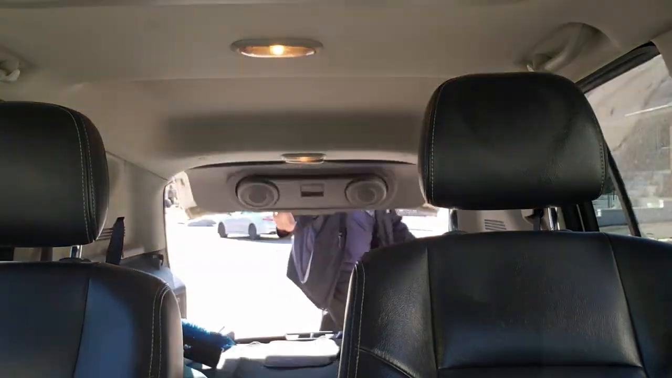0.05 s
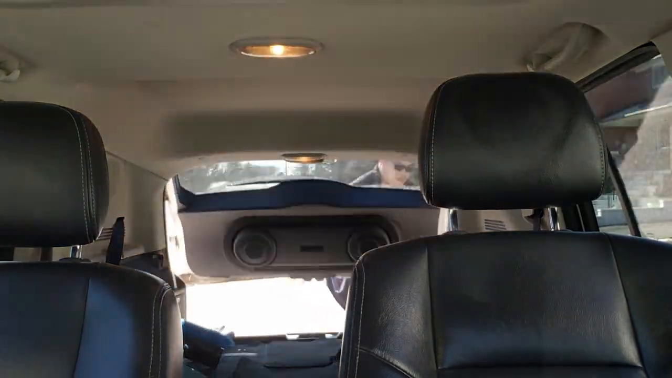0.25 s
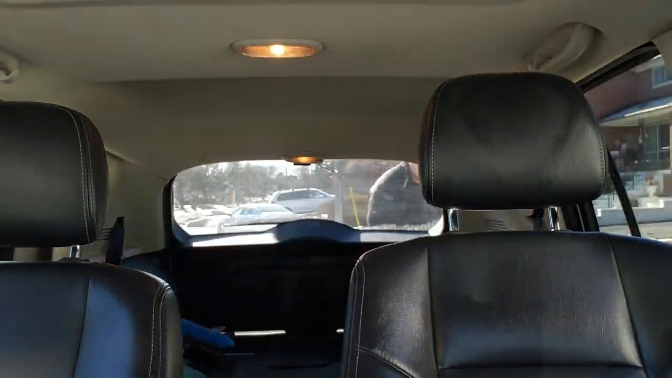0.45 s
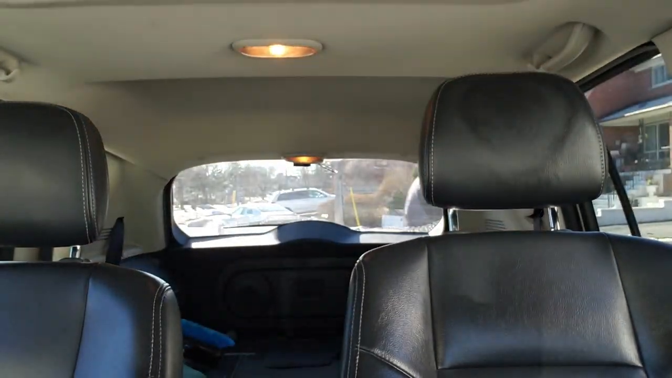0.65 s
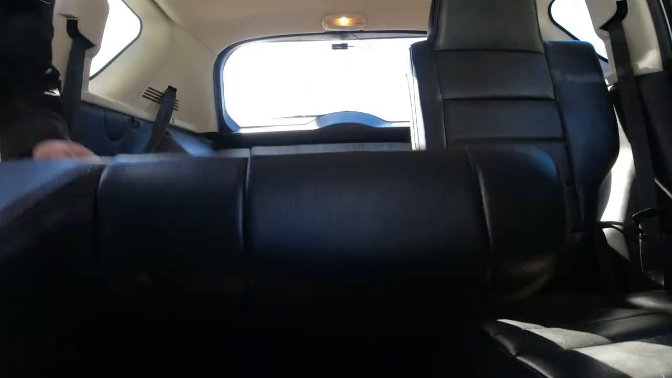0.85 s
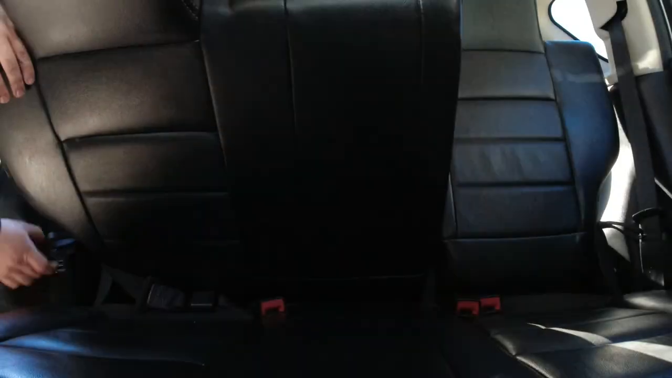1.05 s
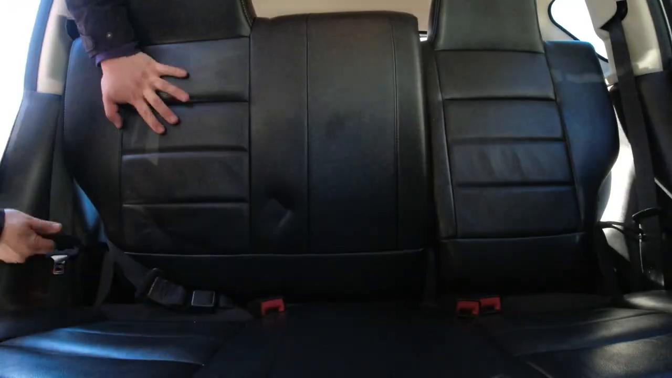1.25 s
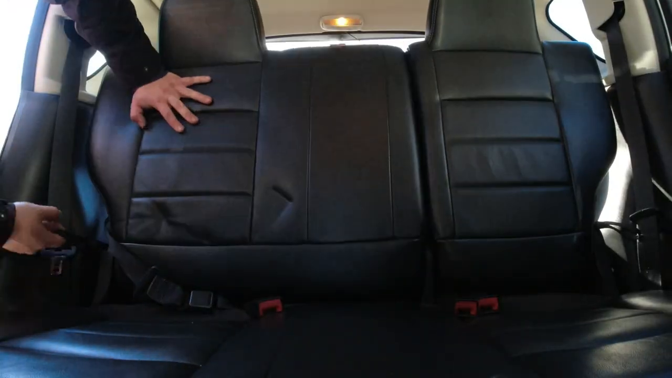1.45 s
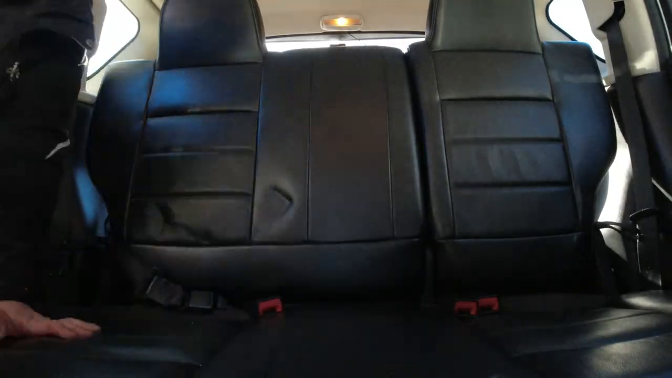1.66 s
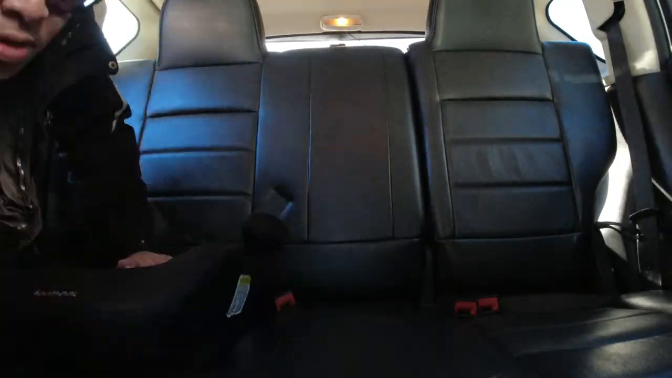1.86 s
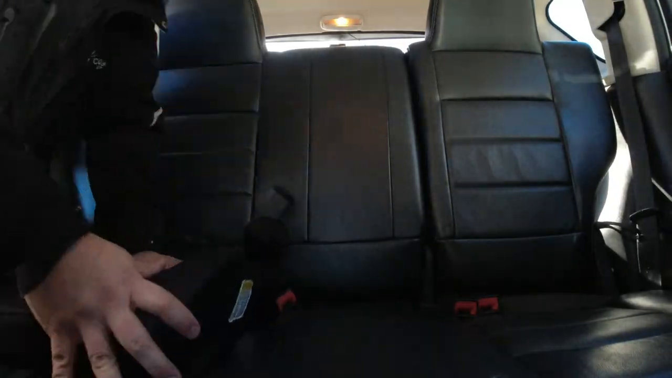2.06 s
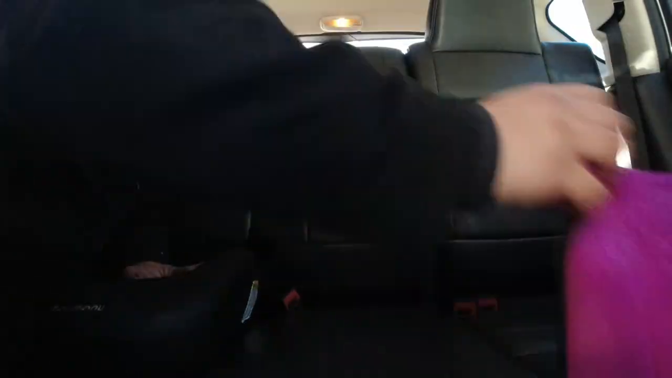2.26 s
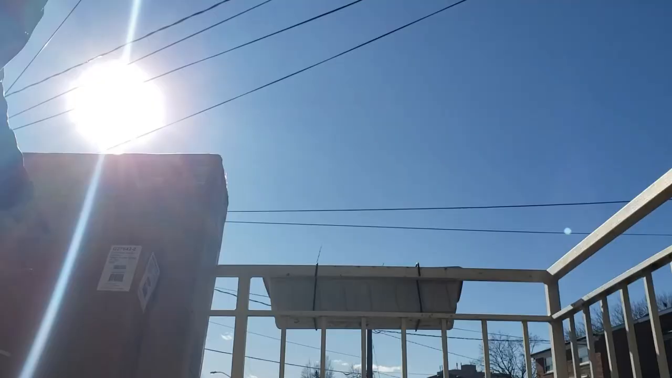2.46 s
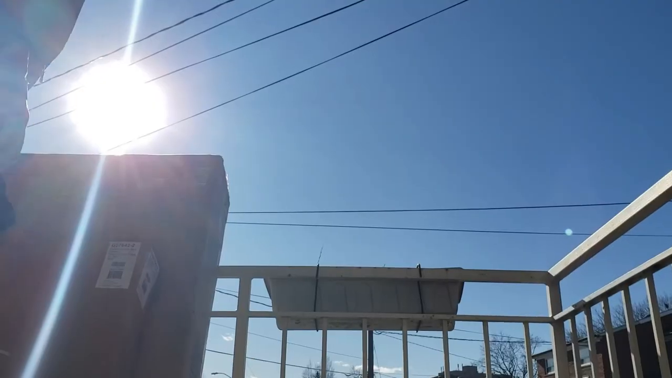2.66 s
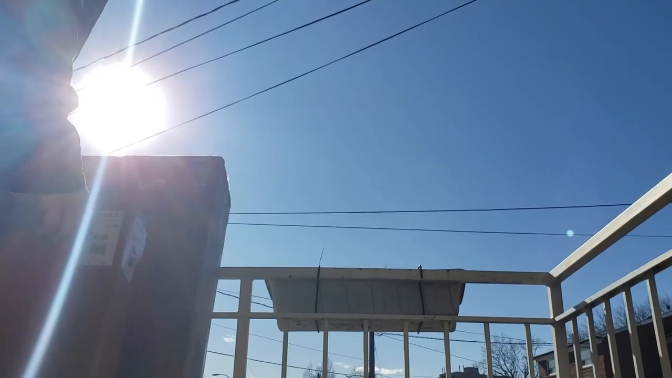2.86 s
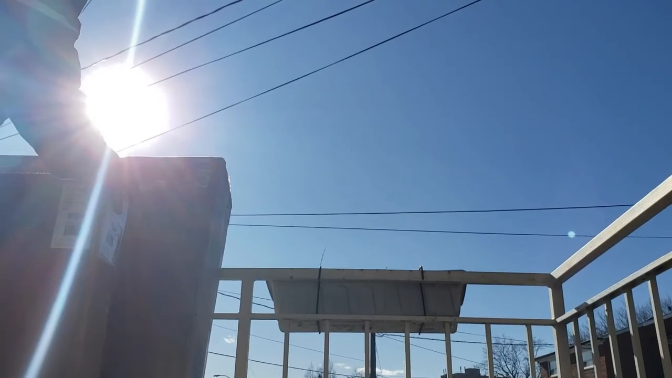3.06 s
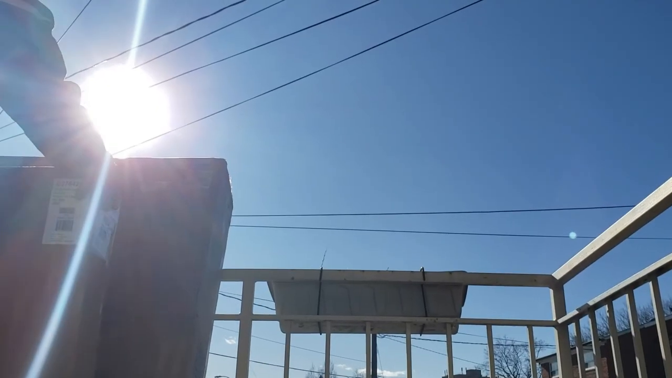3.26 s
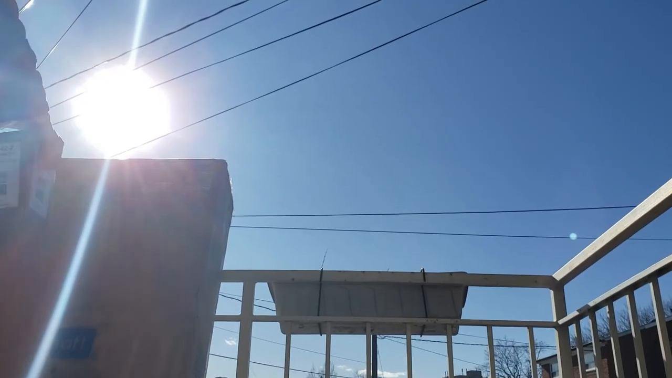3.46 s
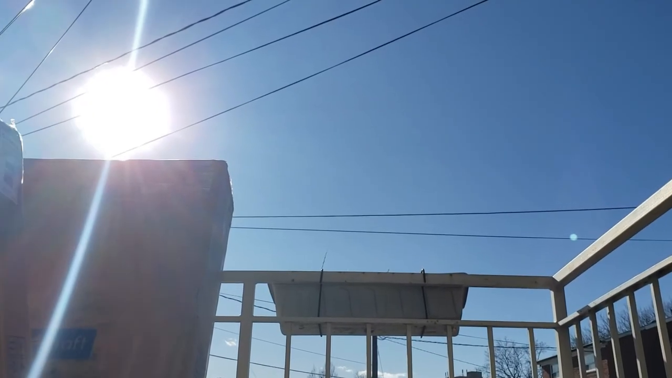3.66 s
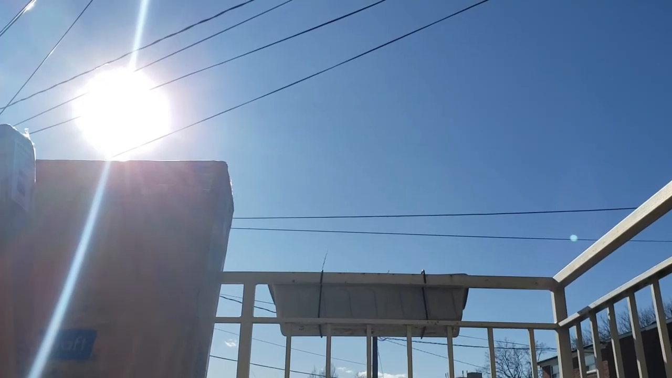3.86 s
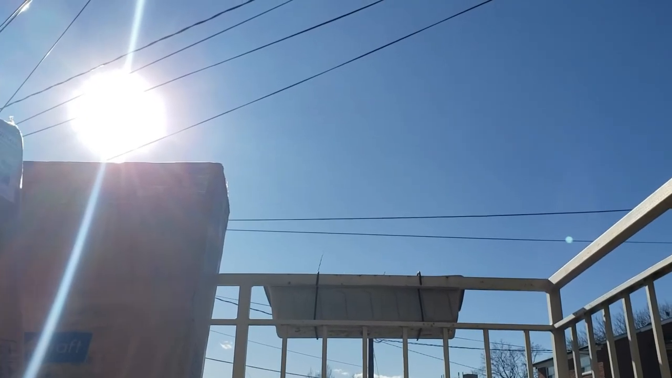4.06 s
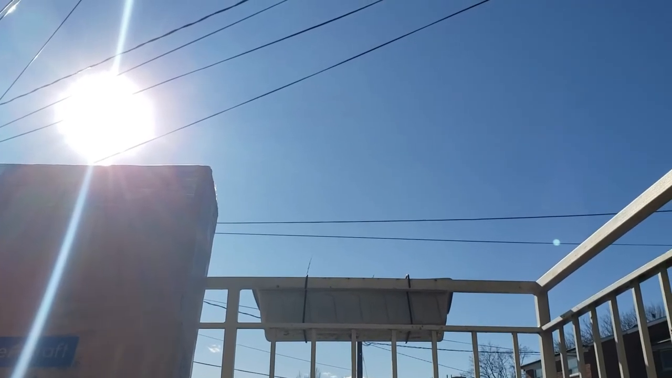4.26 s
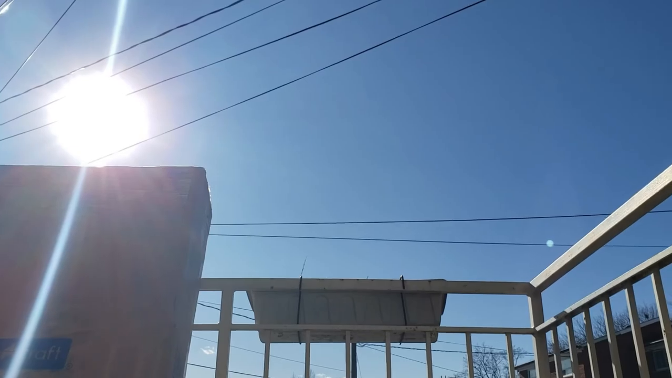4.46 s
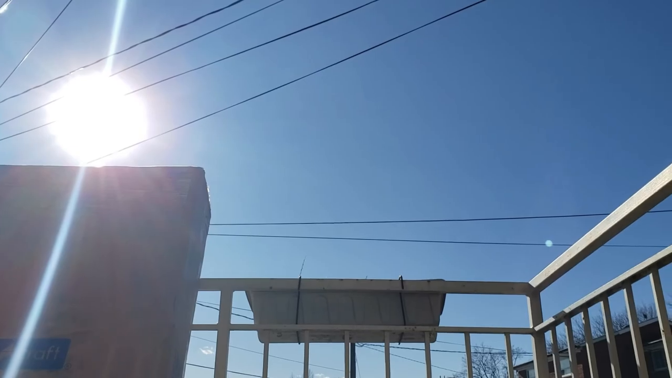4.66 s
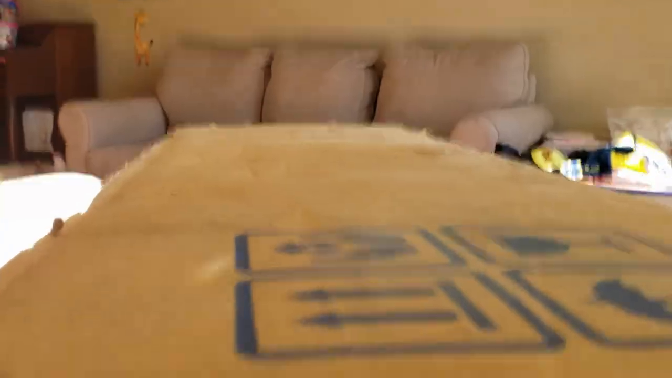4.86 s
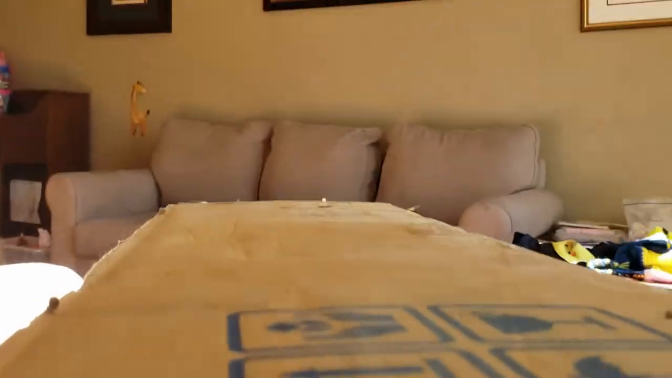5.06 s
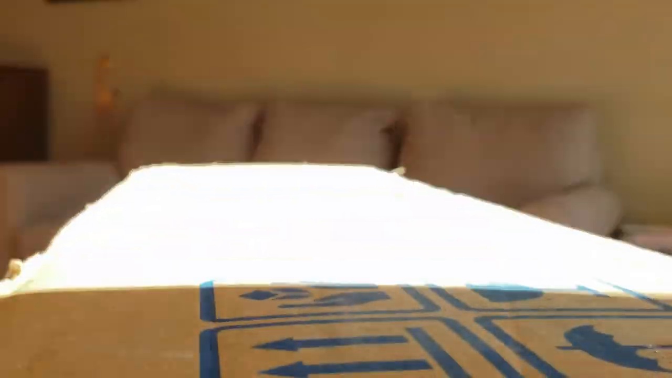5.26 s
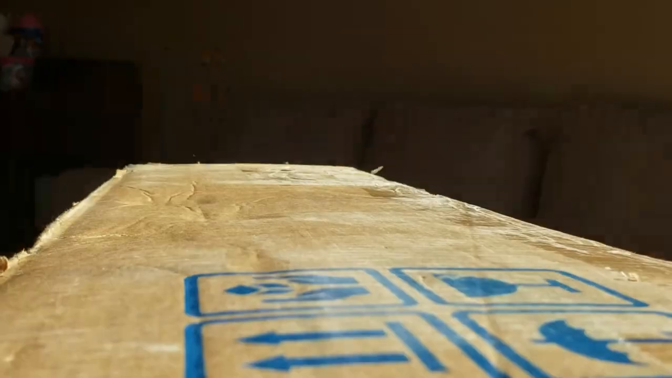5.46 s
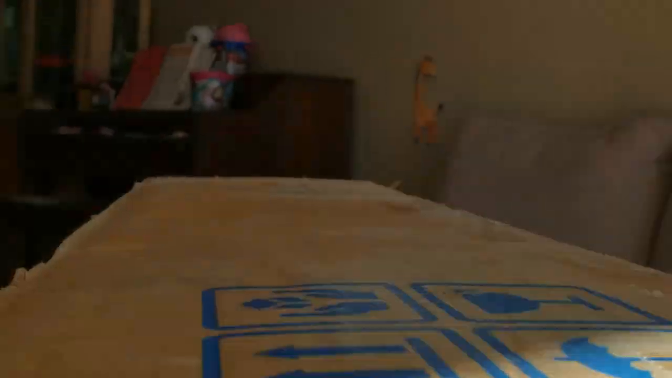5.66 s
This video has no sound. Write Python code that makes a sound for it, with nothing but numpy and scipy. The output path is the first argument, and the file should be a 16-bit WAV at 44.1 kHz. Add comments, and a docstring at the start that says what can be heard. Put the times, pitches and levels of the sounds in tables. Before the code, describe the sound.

Inside a car, a rear liftgate rattles briefly and slams very loudly, with a sharp latch crack and booming cabin. A hard cut brings close, dense knocks, clicks and leather rubbing as bags land on the back seat. Another cut drops to very quiet outdoor traffic rumble and faint hands on cardboard. Finally, in a room, a box scrapes close to the microphone with low bumps and short squeaks.

```python
"""Van liftgate, leather bench, cardboard box

Four scenes joined by hard cuts. Van: the gate rattles down and slams; noise bursts, modal boom, cabin air.
Bench: knocks of noise and short rings, a seat-latch spring buzz and rubbed leather as bags are dropped.
Outdoors: gritty noise for hands on a cardboard box, over a far traffic roar.
Room: the box is dragged; noise scrapes, ringing jolts, stick-slip squeaks. The left microphone port is more open."""
import sys
import numpy as np
from scipy import signal
from scipy.fft import rfft, irfft, next_fast_len
from scipy.io import wavfile
from scipy.ndimage import uniform_filter1d, map_coordinates

SR = 44100
rng = np.random.default_rng(int(sys.argv[2]) if len(sys.argv) > 2 else 0)


def to_wav(s):
    """Save 16-bit WAV."""
    ch = np.atleast_2d(s).T  # columns
    pcm = np.round(np.clip(ch, -1, 1) * 32767)  # PCM
    wavfile.write(sys.argv[1], SR, pcm.astype(np.int16))


N = 252312
T_S = np.arange(N) / SR
SLAM_S = 0.5402

# noise spectrum of the van trim: freq_hz, density_db
TRIM = [(150, -31), (250, 0), (407, 1.5), (484, -7.5), (673, -0.5), (760, -5.5), (4400, -14.5), (5600, -9),
        (7000, -19), (8000, -28.5), (15900, -20)]
# port likeness in the van: freq_hz, likeness_0_to_1
VAN_ALIKE = [(200, 0.83), (4000, .05)]
# left-over-right level in the van: freq_hz, left_minus_right_db
VAN_LEAN = [(60, 8.9), (380, 12.8), (2380, 17.2), (15000, 6.3)]
# port likeness at the bench: freq_hz, likeness_0_to_1
BENCH_ALIKE = [(950, 0.98), (4000, 0.92), (15000, 0.18)]
# port likeness outdoors: freq_hz, likeness_0_to_1
PORCH_ALIKE = [(100, 1), (1200, 0.044)]
# port likeness in the room: freq_hz, likeness_0_to_1
ROOM_ALIKE = [(60, 0.21), (900, 0.016)]
# left-over-right level outdoors and in the room: freq_hz, left_minus_right_db
BOX_LEAN = [(60, -12), (550, 11), (1650, 13.5), (4970, 19.5), (15000, 1)]
# noise spectrum of rubbed cardboard: freq_hz, density_db
CARD = [(710, -33), (1200, -4.5), (2060, -4), (4210, -4.5), (5880, -1), (7870, -15.5), (12100, -10.5),
        (15900, -16.5)]


def amp(db):
    """Amplitude factor of a level in dB."""
    return 10 ** (np.asarray(db) / 20)


def unit(x):
    """x scaled to rms 1."""
    return x / np.sqrt(np.mean(x ** 2) + 1e-20)


def along(points, hz):
    """Values of (freq_hz, value) points, interpolated on a log axis."""
    point_hz, values = np.transpose(points)
    return np.interp(np.log(hz + 1), np.log(point_hz + 1), values)


def gain_curve(rows):
    """Gain per sample from (time_s, level_db) rows."""
    time_s, level_db = np.transpose(rows)
    return amp(np.interp(T_S, time_s, level_db))


def wobble(rate_hz):
    """Smooth random curve, rate_hz knots a second."""
    knots = rng.standard_normal(int(N * rate_hz / SR) + 4)
    return map_coordinates(knots, [np.arange(N) * rate_hz / SR])


def filtered(x, response):
    """x times a response of frequency."""
    size = next_fast_len(N + 8192)
    return irfft(rfft(x, size) * response(np.fft.rfftfreq(size, 1 / SR)), size)[..., :N]


def rush(spectrum, alike, lean=((1, 0),), grain_db=0, rate_hz=300, patchy_db=0):
    """Stereo noise, mid rms 1; grain_db flutters its level, patchy_db breaks it into time-frequency blobs."""
    z = signal.stft(rng.standard_normal((2, N)), nperseg=256)[2]
    blobs = uniform_filter1d(rng.standard_normal(z.shape[1:]), 7, 0)
    blobs = unit(uniform_filter1d(blobs, 4, 1))
    noise = signal.istft(z * amp(patchy_db * blobs), nperseg=256)[1][:, :N]
    common, apart = noise * amp(grain_db * wobble(rate_hz))

    def likeness(hz):
        return np.clip(along(alike, hz), -1, 1)

    def side(hz):
        return amp(along(lean, hz) / 2)

    def gain(hz):
        mid_power = side(hz) ** 2 + side(hz) ** -2 + 2 * likeness(hz)
        return amp(along(spectrum, hz)) / np.sqrt(mid_power)

    left = filtered(common, lambda hz: gain(hz) * side(hz))
    right = filtered(common, lambda hz: gain(hz) / side(hz) * likeness(hz))
    right = right + filtered(apart, lambda hz: gain(hz) / side(hz) * np.sqrt(1 - likeness(hz) ** 2))
    return np.array([left, right]) / np.std(left + right) * 2


def add(track, start_s, piece):
    """Mixes a piece into the track at start_s."""
    i = round(start_s * SR)
    track[i:i + len(piece)] += piece[:N - i]


def held(hold_s, t60_s, attack_s=0.0005):
    """Envelope: exponential rise, hold, exponential decay."""
    t = np.arange(SR // 2) / SR
    return (1 - np.exp(-t / attack_s)) * amp(-60 * np.maximum(t - hold_s, 0) / t60_s)


def ring(modes, spread_db, attack_s):
    """One blow on decaying modes (freq_hz, level_db, t60_s), their levels varied at random."""
    t = np.arange(SR // 2) / SR
    tone = 0
    for hz, db, t60_s in modes:
        level_db = db + spread_db * rng.standard_normal() - 60 * t / t60_s
        tone = tone + amp(level_db) * np.sin(2 * np.pi * hz * t)
    return (1 - np.exp(-t / attack_s)) * tone


def stroke(length_s, edge_s=0.0077):
    """Envelope of a rubbing stroke: flat with ramped ends."""
    t = np.arange(round((length_s + edge_s) * SR)) / SR
    return np.clip(np.minimum(t, length_s + edge_s - t) / edge_s, 0, 1)


def ticks(per_s, spread_db, t60_s):
    """Envelope of rms 1 made of scattered short ticks of uneven size."""
    hits = (rng.random(N) < per_s / SR) * amp(spread_db * rng.standard_normal(N))
    return unit(np.convolve(hits, held(0, t60_s, attack_s=0.00017)[:600])[:N])


def slam_boom():
    """Strut and hinge jolts thud, then the slam's air pulse rings cabin and panel modes."""
    # strut and hinge jolts: start_s, pitch_hz, level_db
    thuds = [(0.053, 179.3, -32), (0.285, 180.8, -21), (.387, 107.8, -24), (0.517, 129.5, -12)]
    # cabin and panel modes: freq_hz, level_db, t60_s
    cabin_modes = [(53.53, 4, 0.58), (57, -10, 0.69), (43.5, -4, 0.78), (75, 6.5, 0.18), (133.4, -6, 0.66),
                   (152, -13.5, 0.98), (183, -8.5, 0.33), (408, -31, 1)]
    slam_db, thud_t60_s = -8, 0.25
    boom = np.zeros(N)
    for start_s, hz, db in thuds:
        add(boom, start_s, ring([(hz, db, thud_t60_s)], spread_db=0.5, attack_s=0.0049))
    add(boom, SLAM_S, -amp(slam_db) * ring(cabin_modes, spread_db=0.5, attack_s=0.005))
    # each port meets the modes in its own phase
    right = filtered(boom, lambda hz: np.exp(0.7j * np.sin(hz / 9)))
    return np.array([boom, right]) * amp([[3], [-4.5]])


def gate_rattle():
    """Trim rattles and gate contacts: decaying noise, treble dying first, over ringing trim panels."""
    # trim rattling as the gate swings down: start_s, level_db, t60_s
    rattles = [(0.113, -31, 0.11), (.277, -37, 0.23), (0.424, -51.5, 0.9)]
    # gate meets seal, latch and stop, then rebounds twice: start_s, level_db, hold_s, t60_s
    contacts = [(.516, -18, 0.016, 0.018), (0.531, -11.5, 0.0072, 0.061), (.544, -29, .01, 0.012),
                (.558, -23, 0.032, 0.17), (0.61, -27, 0.0052, 0.5)]
    # trim panel modes: freq_hz, level_db
    panel_modes = [(640, 2), (930, -5.5), (1560, -13), (2300, -5.5), (2920, -15)]
    rattle_hold_s, panel_t60_s, panel_db = 0.013, 0.087, -6.5
    rattle_dull, contact_dull = 0.63, 0.43  # amplitude share without treble
    bright, dull, panel = np.zeros((3, N))
    events = [(start_s, db, rattle_hold_s, t60_s, rattle_dull) for start_s, db, t60_s in rattles]
    events += [(*row, contact_dull) for row in contacts]
    modes = [(*mode, panel_t60_s) for mode in panel_modes]
    for start_s, db, hold_s, t60_s, share in events:
        add(bright, start_s, amp(db) * (1 - share) * held(hold_s, 0.52 * t60_s))
        add(dull, start_s, amp(db) * share * held(hold_s, t60_s))
        add(panel, start_s, amp(db + panel_db) * ring(modes, spread_db=0.5, attack_s=0.004))
    full_trim = rush(TRIM, VAN_ALIKE, VAN_LEAN, grain_db=2, patchy_db=2)
    low_trim = rush(TRIM, VAN_ALIKE, VAN_LEAN, grain_db=1)
    low_trim = filtered(low_trim, lambda hz: 1.22 / np.hypot(1, (hz / 2500) ** 2))
    return bright * full_trim + dull * low_trim + panel * amp([[3], [-4.5]])


def latch_bite():
    """The latch bites: a very high, brief noise burst."""
    burst = np.zeros(N)
    add(burst, 0.531, amp(-18.5) * held(0.0029, 0.029))
    return burst * rush([(13500, -22), (15100, -2.5), (16000, -26)], VAN_ALIKE, [(1, 13)])


def gas_strut():
    """The gas strut hisses: one stroke of high band noise."""
    start_s, length_s, level_db = 0.22, 0.045, -57
    hiss = np.zeros(N)
    add(hiss, start_s, amp(level_db) * stroke(length_s))
    return hiss * rush([(5000, -25), (6500, 5.5), (7400, -21.5)], VAN_ALIKE, VAN_LEAN, patchy_db=0.5)


def van_background():
    """Low cabin rumble, and street noise shut out as the gate closes."""
    # cabin rumble: time_s, level_db
    cabin_level = [(0.0, -41), (0.662, -27.5), (0.866, -40.5)]
    # cabin rumble spectrum: freq_hz, density_db
    rumble = [(25, -12), (54, 3.5), (139, -8), (172, 4), (253, -17.5), (403, -15.5), (600, -32), (780, -48),
              (1320, -120)]
    air = gain_curve(cabin_level) * rush(rumble, VAN_ALIKE, VAN_LEAN, grain_db=2, rate_hz=8.8)
    opening = np.clip((SLAM_S - T_S) / 0.34, 0, 1)
    far = filtered(rush(TRIM, VAN_ALIKE, VAN_LEAN), lambda hz: 1 / np.hypot(1, (hz / 7500) ** 0.31))
    return air + amp(-53.5) * opening * far


def liftgate():
    """The gate rattles down and slams: boom, trim, latch and strut over the van background."""
    return slam_boom() + gate_rattle() + latch_bite() + gas_strut() + van_background()


def latch_spring():
    """Latch spring buzz: high tones with random level and phase flutter."""
    # spring buzz: start_s, hold_s, then a list of tones: freq_hz, level_db
    spring_buzz = (1.146, .045, [(7000, -54), (10500, -55)])
    start_s, hold_s, tones = spring_buzz
    envelope = np.zeros(N)
    add(envelope, start_s, held(hold_s, 0.038))
    buzz = 0
    for hz, db in tones:
        phase = 2 * np.pi * hz * T_S + 2.8 * wobble(350)
        buzz = buzz + amp(db + 2.29 * wobble(430)) * np.sin(phase)
    return envelope * buzz


def rub_envelopes():
    """Cloth and leather envelopes: each stroke mixes both; louder strokes hold more leather."""
    # leather and cloth strokes: start_s, hold_s, level_db
    rubs = [(1.15, 0.087, -60.5), (1.438, 0.1, -64.5), (1.505, 0.042, -37), (1.631, 0.038, -50),
            (1.711, 0.027, -35), (1.763, 0.1, -47), (1.897, 0.11, -55), (2.068, 0.015, -38),
            (2.141, 0.047, -42.5), (2.197, 0.072, -51.5), (2.28, 0.022, -34), (2.349, 0.037, -40.5),
            (2.397, 0.099, -47)]
    no_leather_db, no_cloth_db = -68, -13.5  # ends of the mixing scale
    cloth, leather = np.zeros((2, N))
    for start_s, hold_s, db in rubs:
        share = np.clip((db - no_leather_db) / (no_cloth_db - no_leather_db), 0, 1)
        add(cloth, start_s, amp(db) * (1 - share) * held(hold_s, 0.089, attack_s=0.0075))
        add(leather, start_s, amp(db) * share * held(hold_s, 0.085, attack_s=0.01))
    return cloth, leather


def knocks():
    """Envelopes of noise puff and bright crack per knock, and its two-mode ring with a cushion thump."""
    # knocks: start_s, level_db, ring_hz, second_ring_hz, thump_db, crack_db
    knock_rows = [(0.97, -42, 530, 1400, -53, -75), (1.067, -32.5, 3560, 4530, -60, -66),
                  (1.14, -26, 1850, 4600, -54, -26.5), (1.256, -24, 614, 2020, -24.5, -61),
                  (1.346, -28.5, 2760, 7440, -37.5, -28), (1.518, -38.5, 830, 4300, -22, -35),
                  (1.529, -24.5, 2030, 750, -26.5, -24), (1.548, -36, 706, 2010, -39, -29),
                  (1.604, -25, 854, 1420, -29.5, -53), (1.618, -21.5, 647, 1250, -32.5, -30.5),
                  (1.675, -34, 1150, 670, -35, -58), (1.7, -24.5, 423, 950, -33, -45),
                  (1.719, -20.5, 710, 1350, -44, -32.5), (1.737, -21, 734, 1160, -19, -43),
                  (1.771, -28, 1300, 1810, -24.5, -54), (1.792, -35, 2230, 2960, -51, -42.5),
                  (1.816, -19.5, 1910, 800, -20, -32), (1.829, -25, 756, 1100, -21.5, -29),
                  (1.935, -29, 790, 2070, -38, -39), (2.03, -32, 2470, 2060, -28, -39),
                  (2.073, -34, 845, 2490, -35, -37), (2.086, -26, 520, 980, -29, -56),
                  (2.15, -45.5, 1900, 1170, -30, -49), (2.226, -38.5, 1740, 730, -45, -55),
                  (2.248, -34.5, 800, 1370, -37, -62), (2.279, -31, 1030, 1680, -52, -55),
                  (2.299, -18, 650, 845, -27, -35), (2.372, -23.5, 2490, 1120, -35, -30.5),
                  (2.457, -28, 645, 905, -41.5, -48), (2.47, -39, 1900, 1430, -41, -40)]
    # seat cushion modes: freq_hz, level_db, t60_s
    cushion_modes = [(143, -11, 0.17), (169, -1, 0.09), (245.7, -2.5, 0.075), (348, -1, 0.065)]
    puff_db, second_db = -9, -1.5  # relative to the ring; to the first ring
    puff, crack, tones = np.zeros((3, N))
    for start_s, db, hz, second_hz, thump_db, crack_db in knock_rows:
        add(puff, start_s, amp(db + puff_db) * held(0.0015, 0.022, attack_s=0.0003))
        add(crack, start_s, amp(crack_db) * held(0.00067, 0.015, attack_s=0.00067))
        # low rings last longer
        modes = [(hz, 0, 0.007 + 7 / hz), (second_hz, second_db, 0.007 + 7 / second_hz)]
        add(tones, start_s, amp(db) * ring(modes, spread_db=1.9, attack_s=0.00012))
        add(tones, start_s, amp(thump_db) * ring(cushion_modes, spread_db=4.5, attack_s=0.0076))
    # the cushion radiates no deep bass
    tones = filtered(tones, lambda hz: 1 / np.hypot(1, (100 / (hz + 1)) ** 4))
    return puff, crack, tones


def bench():
    """Knocks and the latch spring over rubbed cloth and leather, with small ticks in the strokes."""
    # rubbed leather spectrum: freq_hz, density_db
    leather_spectrum = [(30, -8), (90, -0.5), (150, 9.5), (350, 5.5), (650, -3), (2800, -6), (8000, -17.5),
                        (15900, -24)]
    creak_db, rest_db, tick_db = 7.5, -57, -7.5  # leather gain; resting level; ticks over stroke
    puff, crack, tones = knocks()
    cloth, leather = rub_envelopes()
    tick_level = amp(tick_db) * (cloth + leather + amp(rest_db))
    puff = puff + tick_level * ticks(per_s=160, spread_db=3.5, t60_s=0.011)
    mids = [(220, -38), (330, 1.5), (2000, -7), (8000, -22)]
    highs = [(1800, -30), (3500, 1.5), (8000, -6.5), (15900, -6.5)]
    cloth_spectrum = [(300, -7), (3000, 12), (15900, 0)]
    hits = puff * rush(mids, BENCH_ALIKE, patchy_db=3.5) + crack * rush(highs, BENCH_ALIKE, patchy_db=6)
    rustle = cloth * rush(cloth_spectrum, BENCH_ALIKE, grain_db=4, rate_hz=170, patchy_db=3.5)
    creak = rush(leather_spectrum, BENCH_ALIKE, grain_db=0.5, rate_hz=43, patchy_db=6.5)
    creak = (amp(creak_db) * leather + amp(rest_db)) * creak
    return hits + tones + latch_spring() + rustle + creak


def scrape():
    """Dragged box: hollow body and crackling card noise, with low bumps beneath."""
    # scrape level: time_s, level_db
    scrape_level = [(4.819, -65), (4.835, -41.5), (4.875, -43.5), (4.895, -57), (4.91, -40.5), (4.97, -38),
                    (5.16, -36), (5.19, -43), (5.28, -40), (5.4, -42), (5.46, -38), (5.72, -37)]
    # hollow box spectrum: freq_hz, density_db
    box_body = [(110, -21), (260, 0), (580, 0.5), (2000, -15), (2600, -36)]
    # low bump spectrum: freq_hz, density_db
    bump_spectrum = [(20, -21), (60, 0.5), (200, -2.5), (320, -46)]
    bumpy_db = -7.5  # relative to the scrape
    level = gain_curve(scrape_level)
    # the hollow body grows fuller as the box comes close
    nearing_db = 8 * np.minimum(T_S - 5.5, 0)
    hollow = rush(box_body, ROOM_ALIKE, BOX_LEAN, grain_db=0.15, rate_hz=59, patchy_db=1)
    crackle = 0.9 + 0.3 * ticks(per_s=90, spread_db=3, t60_s=0.015)
    card = rush(CARD, ROOM_ALIKE, BOX_LEAN, grain_db=0.5, rate_hz=180, patchy_db=0.5)
    bumps = amp(bumpy_db) * rush(bump_spectrum, ROOM_ALIKE, BOX_LEAN, grain_db=2.5, rate_hz=52)
    return level * (amp(nearing_db) * hollow + crackle * card + bumps)


def squeaks():
    """Stick-slip: where the box grips, regular slips sound a wavering tone with multiples 2, 3 and 5."""
    # squeaks: start_s, length_s, slip_rate_hz, first_db, second_db, third_db
    squeak_rows = [(4.969, .065, 583, -36.5, -60, -62), (5.035, .05, 497, -45, -37, -46),
                   (5.098, .03, 454, -47, -40, -52), (5.12, .028, 565, -55, -40, -55),
                   (5.277, .02, 430, -37, -62, -66), (5.297, .042, 405, -37, -66, -66),
                   (5.434, .026, 352, -33.5, -58, -60), (5.456, .042, 416, -43, -39.5, -39.5)]
    fifth_db = -4  # relative to the third
    track, waver = np.zeros(N), wobble(40)
    for start_s, length_s, hz, first_db, second_db, third_db in squeak_rows:
        t = np.arange(round(length_s * SR)) / SR
        slip_hz = hz * (1 + 0.012 * waver[round(start_s * SR):][:len(t)])
        turns = np.cumsum(slip_hz) / SR
        partials = [(1, first_db), (2, second_db), (3, third_db), (5, third_db + fifth_db)]
        tone = sum(amp(db) * np.sin(2 * np.pi * k * turns) for k, db in partials)
        add(track, start_s, tone * np.sin(np.pi * t / length_s) * np.sqrt(2))
    return track * amp([[4], [-5]])


def floor_jolts():
    """The box starts with jolts that ring the floor modes."""
    # jolts: start_s, level_db
    jolt_rows = [(4.834, -33.5), (4.899, -31), (4.96, -38)]
    # floor under the box: freq_hz, level_db, t60_s
    floor_modes = [(62, -1, 0.21), (103, 3, 0.093)]
    track = np.zeros(N)
    for start_s, db in jolt_rows:
        add(track, start_s, amp(db) * ring(floor_modes, spread_db=1, attack_s=0.0017))
    return track * amp([[-4], [3]])


def drag():
    """The box scrapes and bumps along, jolting and squeaking."""
    return scrape() + squeaks() + floor_jolts()


def hand_envelope():
    """Levels of hand strokes and a faint resting hold on the box, over faint air hiss."""
    # hands on cardboard: start_s, length_s, level_db
    hand_strokes = [(2.567, 0.045, -57), (2.94, 0.0044, -55.5), (3.083, 0.018, -53), (3.163, 0.056, -49.5),
                    (3.517, 0.072, -57.5), (3.665, 0.14, -54.5), (3.992, 0.056, -47.5), (4.375, 0.1, -50),
                    (4.481, 0.081, -55.5)]
    hold = (2.96, 1.5, -63)  # start_s, length_s, level_db
    level = np.full(N, amp(-66))
    for start_s, length_s, db in hand_strokes + [hold]:
        add(level, start_s, amp(db) * stroke(length_s, edge_s=0.033))
    return level


def card_rustle(hands):
    """Hands on cardboard: high noise broken by ticks, plus sharper crackles."""
    # sharper crackles of the card: start_s, level_db
    snaps = [(4.396, -48), (4.421, -42.5), (4.447, -46), (4.471, -46)]
    level = hands * (0.85 + 0.35 * ticks(per_s=140, spread_db=3, t60_s=0.015))
    for start_s, db in snaps:
        add(level, start_s, amp(db) * held(0.0033, 0.023))
    rustle = level * rush(CARD, PORCH_ALIKE, BOX_LEAN, grain_db=0.5, rate_hz=43, patchy_db=0.5)
    return filtered(rustle, lambda hz: 1 / np.hypot(1, (2300 / (hz + 1)) ** 4))


def low_roar(hands):
    """Far traffic as low noise; the hand strokes swell the same noise."""
    # far traffic: time_s, level_db
    traffic_level = [(2.52, -57.5), (2.74, -60), (4.82, -50.5)]
    # far traffic spectrum: freq_hz, density_db
    traffic_spectrum = [(20, -17), (76, 3), (151, -6), (807, -11.5), (1960, -23.5), (3250, -34.5),
                        (5500, -120)]
    level = gain_curve(traffic_level) + amp(-7.5) * hands
    return level * rush(traffic_spectrum, PORCH_ALIKE, BOX_LEAN, grain_db=2.5, rate_hz=41)


def porch():
    """Hands rustle over the cardboard against far traffic."""
    hands = hand_envelope()
    return card_rustle(hands) + low_roar(hands)


def scene():
    """Gates each of the four scenes to its span, with fades of a few milliseconds at most."""
    # scene boundaries: time_s
    cuts = [0, .866, 2.517, 4.819, 5.73]
    total = np.zeros((2, N))
    for sound, start_s, end_s in zip([liftgate(), bench(), porch(), drag()], cuts, cuts[1:]):
        fade_in = np.clip((T_S - start_s) / 0.00091, 0, 1)
        fade_out = np.clip((end_s - T_S) / 0.004, 0, 1)
        total += sound * fade_in * fade_out
    return total


def record(dry):
    """Soft saturation towards full scale, then a sharp band limit."""
    top_hz = 16100
    soft = dry / (1 + np.abs(dry) ** 6) ** (1 / 6)
    return filtered(soft, lambda hz: hz < top_hz)


dry = scene()
out = record(dry)
to_wav(out)
```